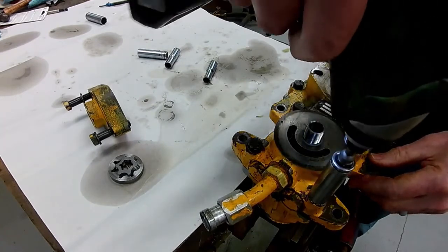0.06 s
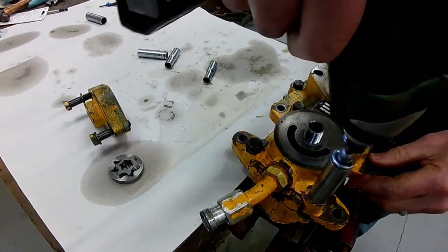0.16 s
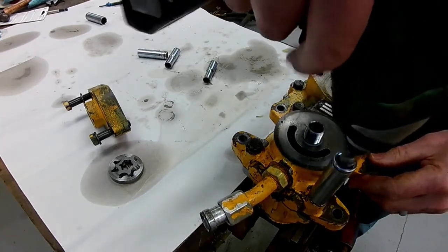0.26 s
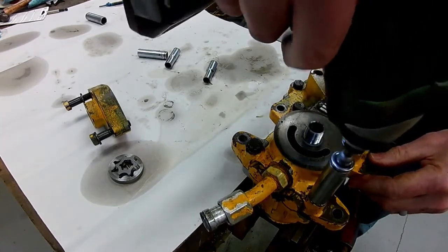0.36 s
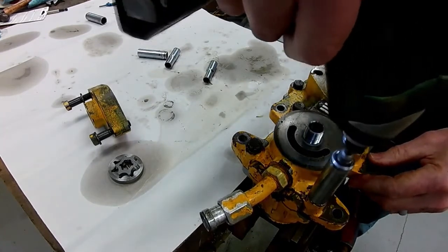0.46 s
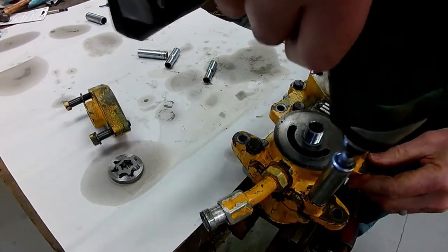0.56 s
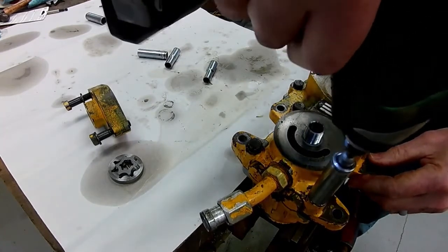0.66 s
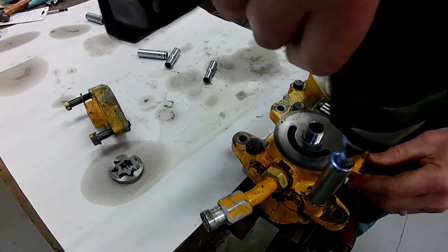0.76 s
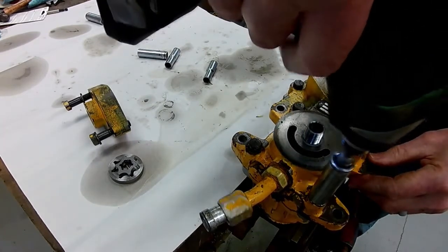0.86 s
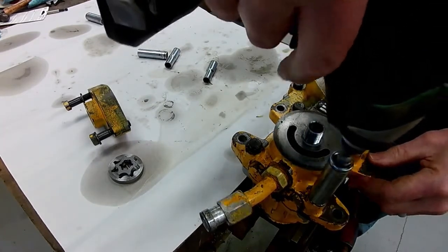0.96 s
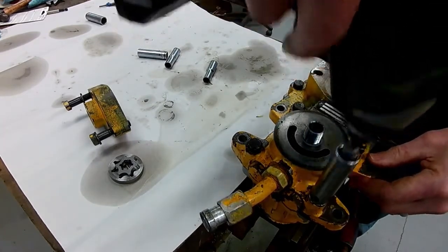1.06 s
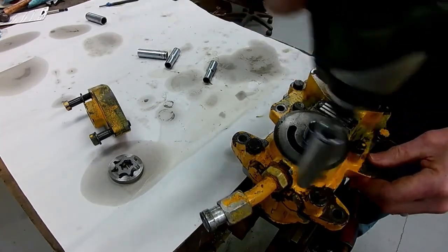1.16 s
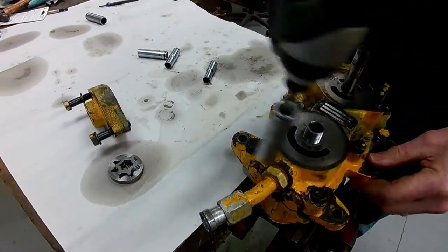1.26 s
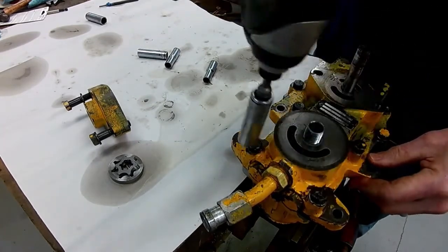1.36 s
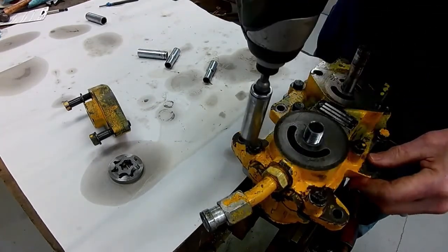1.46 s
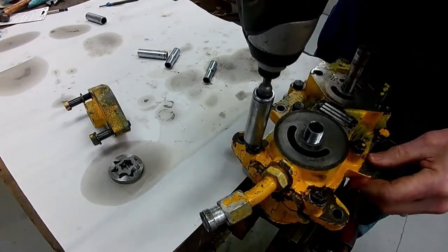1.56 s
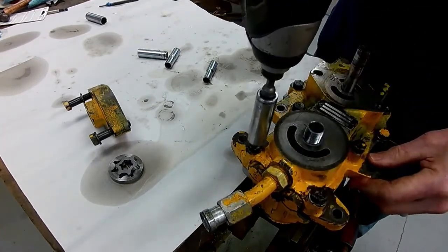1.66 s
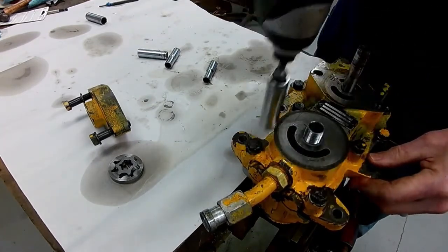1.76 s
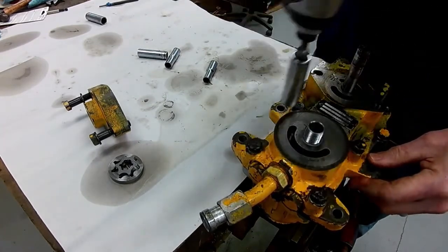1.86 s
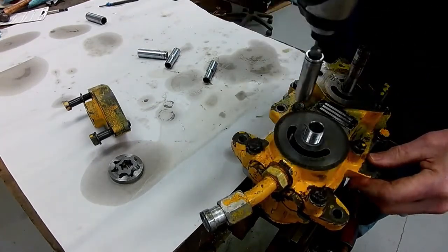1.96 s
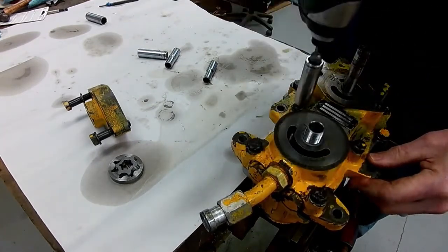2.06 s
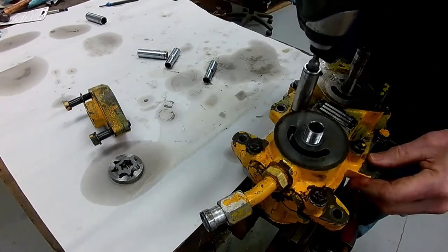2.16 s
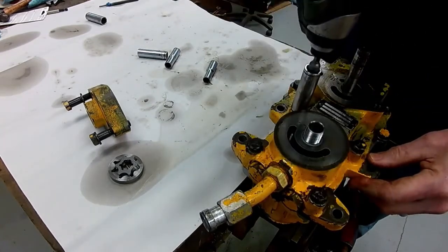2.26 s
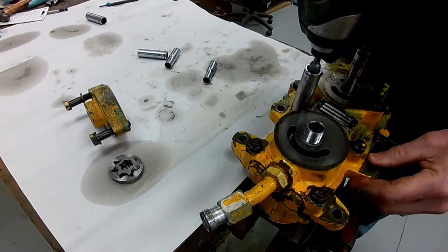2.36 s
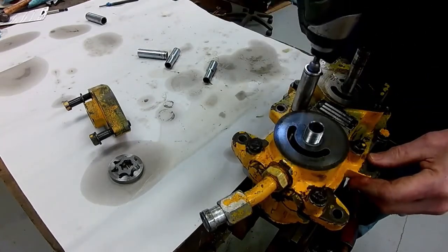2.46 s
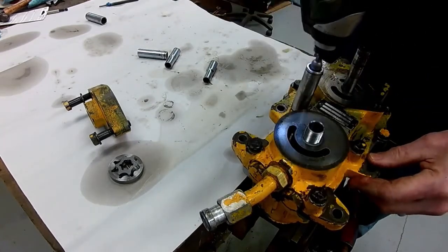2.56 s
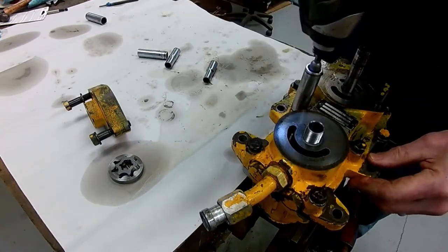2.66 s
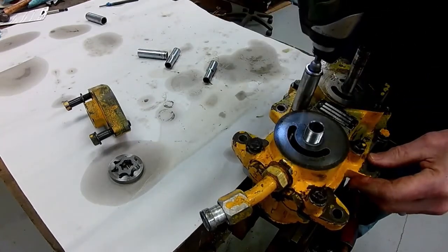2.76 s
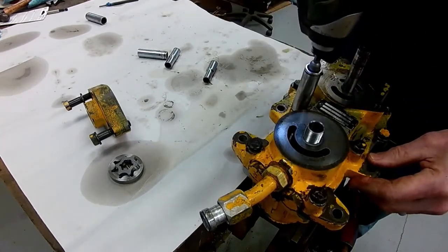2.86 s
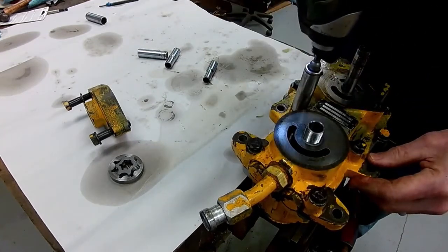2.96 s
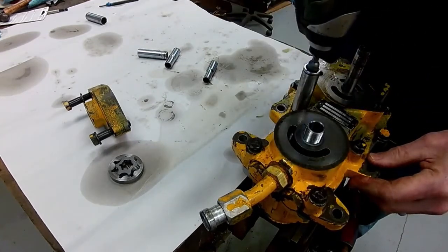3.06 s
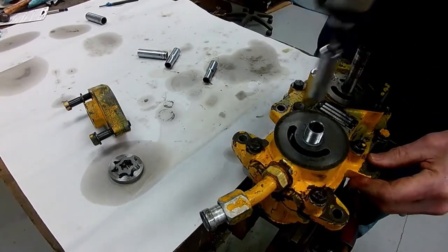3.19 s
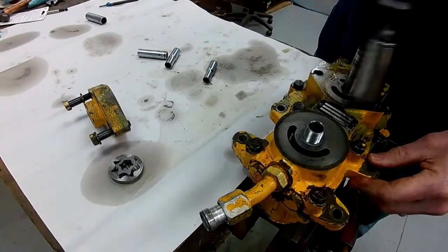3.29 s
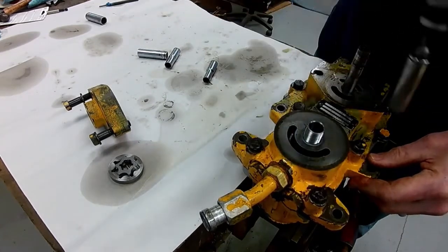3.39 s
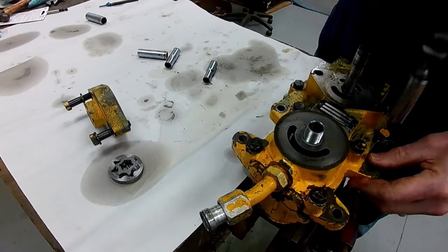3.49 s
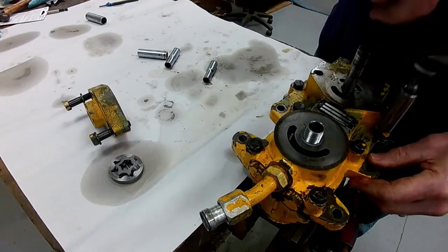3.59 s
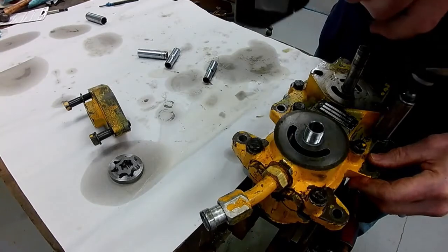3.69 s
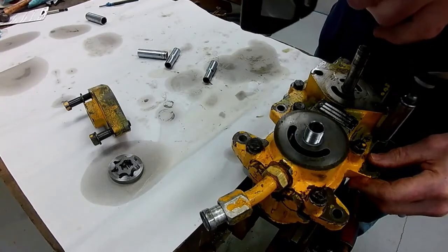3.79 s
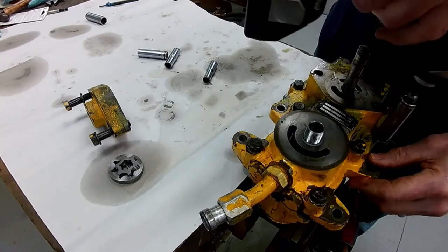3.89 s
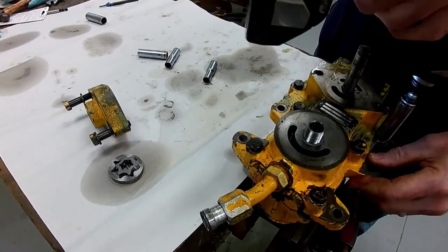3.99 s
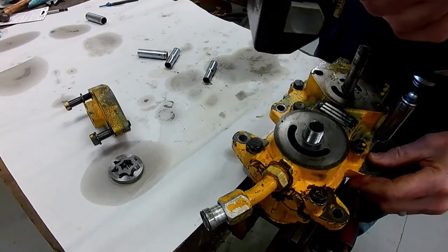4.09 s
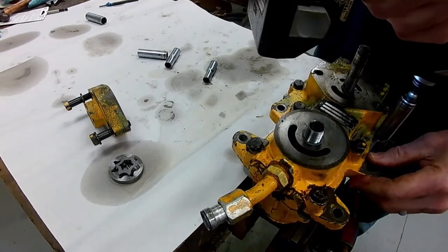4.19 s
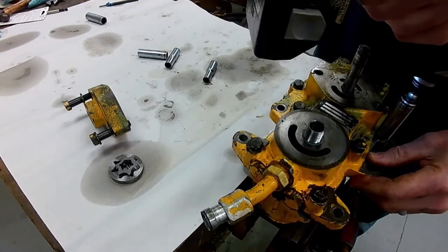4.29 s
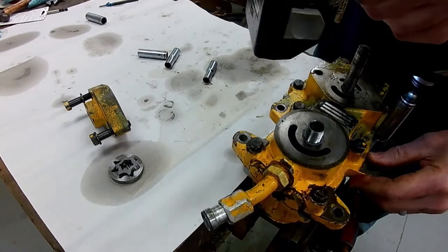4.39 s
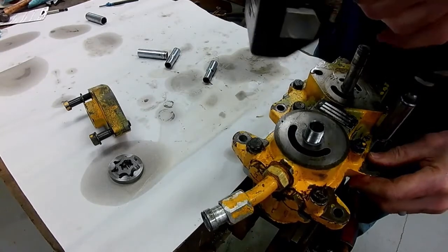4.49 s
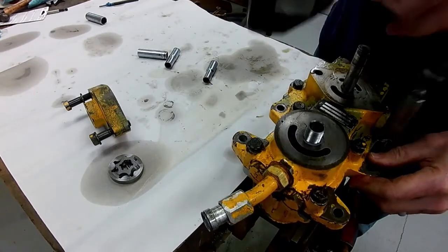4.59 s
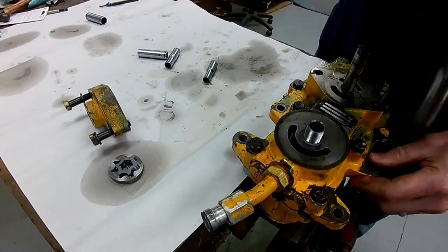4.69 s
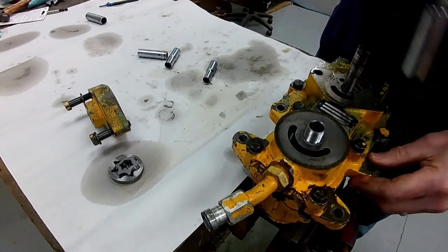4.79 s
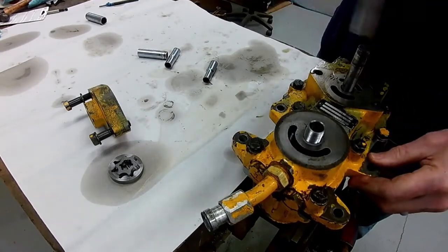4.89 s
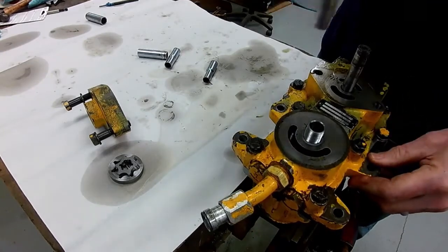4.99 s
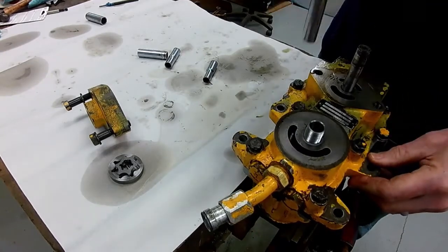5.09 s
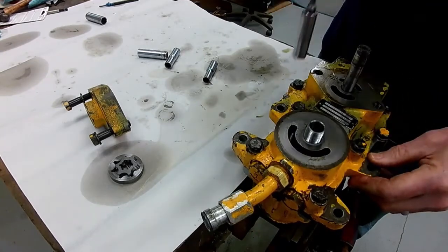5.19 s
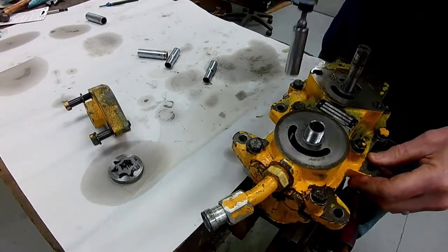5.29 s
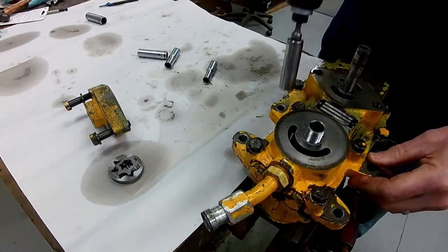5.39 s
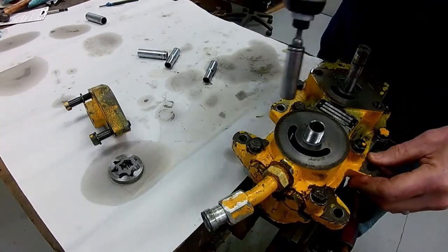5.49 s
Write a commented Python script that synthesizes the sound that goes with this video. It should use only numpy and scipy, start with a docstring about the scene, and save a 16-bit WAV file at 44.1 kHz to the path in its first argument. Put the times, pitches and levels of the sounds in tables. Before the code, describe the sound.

A cordless impact wrench hammers bolts in four loud, rattling metallic bursts, with quiet pauses and small socket clinks, in a reverberant workshop.

```python
"""Impact wrench on a pump housing

A cordless impact wrench tightens three bolts on a cast pump housing, in four short bursts on a workshop bench.
Hammer blows, about 45 a second, are impulses that ring resonant steel, with more chatter on a tight bolt.
Between bolts the socket clinks onto the next head; motor and gears are throbbing shaped noise.
The room rings on through decaying noise tails, and the close microphone overloads by flattening the peaks."""
import sys
import numpy as np
from scipy import signal
from scipy.fft import rfft, irfft
from scipy.io import wavfile
from scipy.ndimage import uniform_filter1d

SR = 44100
rng = np.random.default_rng(int(sys.argv[2]) if len(sys.argv) > 2 else 0)


def to_wav(s):
    """Save 16-bit WAV."""
    ch = np.atleast_2d(s).T  # columns
    pcm = np.round(np.clip(ch, -1, 1) * 32767)  # PCM
    wavfile.write(sys.argv[1], SR, pcm.astype(np.int16))


N = 244314
TIME = np.arange(N) / SR


def gain_of(db):
    """Logarithmic level: decibels to an amplitude ratio."""
    return 10 ** (np.asarray(db) / 20)


def evened(x):
    """Power normalisation: scales to rms 1."""
    return x / np.sqrt(np.mean(x ** 2) + 1e-20)


def read(points, hz):
    """Interpolation on a logarithmic frequency axis."""
    f, value = np.transpose(points)
    return np.interp(np.log(hz + 1), np.log(f + 1), value)


def add(mix, s, sound):
    """Superposition: mixes a sound in at time s."""
    part = mix[max(round(s * SR), 0):][:len(sound)]
    part += sound[:len(part)]


def response(spectrum, modes=(), size=4096):
    """Minimum phase: the causal impulse response of a smooth spectrum with resonances on top."""
    hz = abs(np.fft.fftfreq(size, 1 / SR))
    db = read(spectrum, hz)
    for f, width, peak in modes:
        db = db + peak / (1 + (2 * (hz - f) / width) ** 2)
    # the Hilbert transform of the log magnitude supplies the phase
    log_response = np.conj(signal.hilbert(np.log(gain_of(db))))
    return np.fft.ifft(np.exp(log_response)).real[:size // 2]


def noise(spectrum):
    """Spectral shaping: steady random noise of rms 1 with the given spectrum."""
    shape = gain_of(read(spectrum, np.fft.rfftfreq(N, 1 / SR)))
    return evened(irfft(rfft(rng.standard_normal(N)) * shape, N))


def strike(ring, chatter_s, rattle, settle_s, contacts_per_s, size=1024):
    """Impulse excitation: a hard contact, then tiny rebounds, ring the steel; rms 1 over about a blow period."""
    t = np.arange(size) / SR
    rebounds = rng.standard_normal(size) * (rng.random(size) < contacts_per_s / SR)
    contacts = rattle * rebounds * np.exp(-np.maximum(t - chatter_s, 0) / settle_s)
    contacts[0] = 1
    sound = signal.oaconvolve(contacts, ring)
    return sound * np.sqrt(size / np.sum(sound ** 2))


# Spectrum of the still workshop's air. Each row: frequency in Hz, relative density in dB per Hz.
AIR_SPECTRUM = [(15, -20), (25, 2), (86, -1), (163, -3), (250, -5.5), (301, -5), (344, -6.5), (438, -10.5),
                (543, -2.5), (604, -7.5), (655, -10.5), (856, -10), (1210, -13), (3540, -37.5),
                (15000, -67.5)]
# Faint steady tones. Each row: frequency in Hz, relative level in dB.
HUM_TONES = [(166.9, -62.5), (538.3, -61), (651.4, -77.5), (759.0, -68.5), (904.4, -65)]


def background(air_db=-47.5, hum_db=-1):
    """Stationary noise and pure tones: the low rush of the room with a faint hum."""
    out = gain_of(air_db) * noise(AIR_SPECTRUM)
    for hz, db in HUM_TONES:
        tone = np.sin(2 * np.pi * (hz * TIME + rng.random()))
        out += gain_of(db + hum_db) * np.sqrt(2) * tone
    return out


# Runs of the motor and gears, up before the hammer engages and braked after it.
# Each row: trigger pulled in seconds, trigger released in seconds, level of the noise at full speed in dB.
MOTOR_RUNS = [(-.03, 0.077, -34), (0.051, 0.284, -18.5), (0.375, 0.894, -14), (2.425, 3.017, -18.5),
              (3.971, 4.512, -17.5)]
# Spectrum of the gear noise. Each row: frequency in Hz, relative density in dB per Hz.
GEAR_SPECTRUM = [(60, -14.5), (300, -11.5), (700, -6.5), (1200, 2), (2200, -13), (5000, -17.5),
                 (16000, -32)]


def motor(run_up_s=.03, brake_s=0.0086, shaft_hz=240, mesh=0.19):
    """Amplitude modulation: gear noise grows with the square of motor speed and throbs once a shaft turn."""
    out, gears = np.zeros(N), noise(GEAR_SPECTRUM)
    for on, off, db in MOTOR_RUNS:
        run_up = np.clip((TIME - on) / run_up_s, 0, 1)
        # speed falls half as fast as its square, so brake_s is the decay time of the sound
        speed = run_up * np.exp(-np.maximum(TIME - off, 0) / (2 * brake_s))
        throb = 1 + mesh * np.cos(2 * np.pi * np.cumsum(shaft_hz * speed) / SR)
        out += gain_of(db) * speed ** 2 * throb * gears
    return out


# Single knocks: stray hammer blows in the first burst, a tap as the tool runs down, and light touches of the socket.
# Each row: start in seconds, level in dB, ring in Hz, chatter in seconds.
KNOCK_ROWS = [(0.0151, -17.5, 1570, 0.00055), (0.0605, -23.5, 1200, 0.0024), (0.075, -6, 1460, .004),
              (.117, -8.5, 1307, .0027), (.256, -7, 1240, 0.004), (1.040, -30.5, 1370, .0014),
              (2.089, -49, 1700, 0.0011), (2.098, -44.5, 1050, .002), (2.1305, -43, 1390, .002),
              (2.172, -40.5, 1230, 0.00085), (2.4465, -33, 900, 0.0066), (2.4703, -10, 1170, 0.0006),
              (3.078, -23, 1060, 0.0078), (3.6647, -39.5, 1810, .002), (3.673, -42, 1850, .003),
              (3.778, -42, 1450, 0.00095), (3.799, -39.5, 1300, .003), (3.810, -37.5, 1000, 0.0025),
              (4.0137, -15.5, 1310, .0012)]
# Steel of the single knocks and of the lightly touched socket.
# Each row: frequency in Hz, relative density in dB per Hz.
SOCKET_SPECTRUM = [(30, -26.5), (300, -23.5), (700, -4.5), (1100, -4.5), (1700, -3.5), (2400, -12),
                   (3600, -23), (4900, -19), (6500, -27.5), (16000, -46.5)]


def single_contacts(rows, ring_width_hz=600, ring_db=10):
    """Modal excitation: each single knock or tick stresses one resonance of the steel."""
    out = np.zeros(N)
    for s, db, hz, chatter_s in rows:
        ring = response(SOCKET_SPECTRUM, [(hz, ring_width_hz, ring_db)])
        contact = strike(ring, chatter_s, rattle=.3, settle_s=0.003, contacts_per_s=5500)
        add(out, s, gain_of(db) * contact)
    return out


# How the housing rings under each bolt, before each blow varies it.
# Each row: frequency in Hz, width in Hz, peak in dB over the plain steel spectrum.
FIRST_BOLT_MODES = [(1064, 140, 4), (1456, 230, 3.5), (2320, 280, 4.5), (3350, 100, 3.5), (4496, 59, 3),
                    (7300, 1500, 5.5)]
SECOND_BOLT_MODES = [(1027, 160, 5), (1372, 150, 2), (3200, 91, 1.6), (4320, 100, 5.8), (5100, 190, 5.5)]
THIRD_BOLT_MODES = [(990, 370, 3.75), (1846, 620, 8.2), (2662, 260, 7), (3064, 206, 8), (5470, 480, 6.4)]
# Hammer, anvil and socket struck together. Each row: frequency in Hz, relative density in dB per Hz.
STEEL_SPECTRUM = [(30, -29), (130, -22), (200, -22.5), (300, -13.5), (450, -11), (620, -8), (900, -2),
                  (1250, 0.5), (1700, -4), (2300, -11.5), (3500, -18), (5000, -14), (6500, -16),
                  (8500, -25), (16000, -37.5)]
FREE_RATE, LOADED_RATE = 51, 47.2  # starting blows per s in the quicker first burst and in the later ones
# Bursts of hammering. Each row: first blow in seconds, trigger released in seconds, starting rate in blows per
# second, relative force in dB, bolt tightness (0-1) at the start, the same at the end, easing off at the end in dB,
# first coasting tap in dB, bench boom in dB.
HAMMER_BURSTS = [(0.071, 0.267, FREE_RATE, -2, 0.27, .4, -2.5, -20.5, -1),
                 (0.406, 0.90, LOADED_RATE, 1, 0.29, 0.96, -13, -26, 6.5),
                 (2.478, 3.001, LOADED_RATE, 0, .05, 0.98, -0.5, -16.5, 0),
                 (4.021, 4.489, LOADED_RATE, -1.5, .0, .5, -1, -19, -9.5)]
SLOWING_S = .00007  # each gap between blows is this much longer than the last as the motor labours
LOOSE_DB, TIGHT_DB = -1.5, -1  # relative level of a blow on a loose and on a tight bolt
LOOSE_CHATTER_S, TIGHT_CHATTER_S = 0.00055, 0.0071  # typical chatter of the socket after it
COAST_FADE_DB = 6.5  # each tap of the coasting hammer is this much weaker
BENCH_HZ, BENCH_WIDTH_HZ = 110, 260  # the bench booms under the housing
GRAZE_TIGHT_DB = 6.5  # the grazing grows by this on a fully tight bolt
EASE_S = 0.038  # the blows weaken over this time as the trigger is let go


def struck_steel(modes, boom_db):
    """Modal coupling: the socket seats differently at every blow and favours other, slightly shifted modes."""
    seating = np.clip(1 + .6 * rng.standard_normal(len(modes)), -.3, 2)
    detune = 1 + .03 * rng.standard_normal(len(modes))
    seated = [(hz * shift, width, db * share)
              for (hz, width, db), share, shift in zip(modes, seating, detune)]
    return response(STEEL_SPECTRUM, seated + [(BENCH_HZ, BENCH_WIDTH_HZ, boom_db)])


def hammer(burst, modes, uneven_db=1.37, limp=.35, limp_s=.0014, lug_db=-1.5, graze_db=-17, graze_s=.011, count=3):
    """Repeated impact: two lugs strike in turn, slower and with longer chatter as the bolt tightens, then coast."""
    start, stop, rate, force_db, tight_from, tight_to, ease_db, coast_db, boom_db = burst
    order = np.arange(int((stop - start) * rate) + count + 1)
    times = start + order / rate + SLOWING_S * order ** 2 / 2
    out = np.zeros(N)
    for k, at in enumerate(times[times <= stop]):
        shift_s, strong, long, graze = rng.standard_normal(4) * [.0002, 1, .15, .25]
        ring = struck_steel(modes, boom_db)
        tight = np.clip(np.interp(at, [start, stop], [tight_from, tight_to]), 0, 1)
        chatter = LOOSE_CHATTER_S + tight * (TIGHT_CHATTER_S - LOOSE_CHATTER_S)
        # on a tight bolt one lug lands early and chatters long, the other late and short
        lug = (-1) ** k * tight
        level_db = force_db + LOOSE_DB + tight * (TIGHT_DB - LOOSE_DB)
        level_db += uneven_db * strong + lug_db * lug
        level_db += np.interp(at, [stop - EASE_S, stop], [0, ease_db])
        blow_chatter = chatter * np.exp(limp * lug + long)
        blow = strike(ring, blow_chatter, rattle=.35, settle_s=0.0017, contacts_per_s=6000)
        add(out, at - limp_s * lug + shift_s, gain_of(level_db) * blow)
        # between blows the lug grazes over the top of the anvil
        scrape = strike(ring, chatter, rattle=1.3, settle_s=0.0061, contacts_per_s=3000)
        scrape_db = level_db + graze_db + GRAZE_TIGHT_DB * tight
        add(out, at + graze_s * (1 + graze), gain_of(scrape_db) * scrape)
    coasting_ring = response(STEEL_SPECTRUM, modes)
    for k, at in enumerate(times[times > stop][:count]):
        tap = strike(coasting_ring, LOOSE_CHATTER_S, rattle=2.0, settle_s=0.002, contacts_per_s=3400)
        add(out, at, gain_of(coast_db - COAST_FADE_DB * k) * tap)
    return out


# The socket feels its way onto a bolt head. Each row: start in seconds, end in seconds, relative level in dB.
FUMBLE_ROWS = [(2.104, 2.125, -47.5), (2.175, 2.2, -48), (3.682, 3.775, -47.5)]
TICK_GAP_S, TICK_HZ, TICK_CHATTER_S = 0.043, 1450, .003  # nominal spacing and pitch, and the chatter of a tick


def ticks(uneven_db=2, spread=.18):
    """Random excitation: light touches scattered through each fumble, as rows like those of the knocks."""
    rows = []
    for start, end, db in FUMBLE_ROWS:
        for s in np.arange(start, end, TICK_GAP_S):
            late, strong, high = rng.standard_normal(3)
            at = s + TICK_GAP_S * spread * abs(late)
            hz = TICK_HZ * np.exp(spread * high)
            rows.append((at, db + uneven_db * strong, hz, TICK_CHATTER_S))
    return rows


def sliding(slide_db=-6, fade_s=.012):
    """Friction noise: during each fumble the socket's rim slides over the bolt head."""
    level = np.zeros(N)
    for start, end, db in FUMBLE_ROWS:
        fade = np.interp(TIME, [start, start + fade_s, end, end + 2 * fade_s], [0, 1, 1, 0])
        level += gain_of(db + slide_db) * fade
    return level * noise(SOCKET_SPECTRUM)


# Dull bumps of the housing as the tool settles on it. Each row: start in seconds, level in dB, frequency in Hz.
BUMP_ROWS = [(3.678, -42.5, 175.2), (3.818, -37, 197.2)]


def bumps(t60=0.15):
    """Damped oscillation: the heavy housing rocks briefly on the bench."""
    out, t = np.zeros(N), np.arange(SR // 4) / SR
    for s, db, hz in BUMP_ROWS:
        decay = 10 ** (-3 * t / t60)
        add(out, s, gain_of(db) * decay * np.sin(2 * np.pi * hz * t))
    return out


# Reverberation of the room. Each row: frequency in Hz, time to decay by 60 dB in seconds.
ROOM_DECAY = [(100, 0.22), (250, 0.9), (550, 0.65), (1400, 0.61), (3700, 0.69), (8000, 0.33), (16000, 0.61)]


def tail(build_s=0.0013):
    """Diffuse reverberation: sparse random reflections build up, then die band by band."""
    reflections = rng.standard_normal(SR) * (rng.random(SR) < 4000 / SR)
    hz, t, z = signal.stft(reflections, SR, nperseg=256)
    decay = 10 ** (-3 * t / read(ROOM_DECAY, hz)[:, None])
    z = z * decay * (1 - np.exp(-(t / build_s) ** 2))
    taps = signal.istft(z, SR, nperseg=256)[1]
    return taps / np.linalg.norm(taps)


def workshop(x, near_db=-16, room_db=-15, near_s=0.0058, count=3):
    """Reflection: quick echoes off bench and worker, and a room tail that shifts as the tool moves."""
    t = np.arange(SR // 20) / SR
    echoes = rng.choice([-1., 1.], len(t)) * (rng.random(len(t)) < 1500 / SR)
    near = echoes * (t > .002) * np.exp(-t / near_s)
    out = x + gain_of(near_db) * signal.oaconvolve(x, near / np.linalg.norm(near))[:N]
    # the sound is steadily passed round between several tails
    for k in range(count):
        share = np.sqrt(2 / count) * np.cos(np.pi * (2.5 * TIME + k / count))
        out = out + gain_of(room_db) * signal.oaconvolve(x * share, tail())[:N]
    return out


def scene():
    """Superposition of the four bursts (two on the first bolt), motor and single contacts in the room."""
    bolts = [FIRST_BOLT_MODES, FIRST_BOLT_MODES, SECOND_BOLT_MODES, THIRD_BOLT_MODES]
    blows = sum(hammer(burst, modes) for burst, modes in zip(HAMMER_BURSTS, bolts))
    contacts = single_contacts(KNOCK_ROWS) + single_contacts(ticks()) + sliding()
    sources = motor() + contacts + blows + bumps()
    return (workshop(sources) + background())[None]


def overload(x, ceiling, knee):
    """Saturation: linear for small signals, flattening toward the ceiling."""
    return x / (1 + abs(x / ceiling) ** knee) ** (1 / knee)


# Frequency response of the microphone. Each row: frequency in Hz, gain in dB.
MICROPHONE_RESPONSE = [(20, -7), (100, -1), (4000, -2.5), (5300, -8.5), (6500, -15.5), (7900, -22.5),
                       (9500, -23), (16000, -22.5)]
# Faint treble fizz on loud passages. Each row: frequency in Hz, relative density in dB per Hz.
FIZZ_SPECTRUM = [(30, -42.5), (4000, -20.5), (6500, 2), (9000, 2.5), (16000, -14.5)]


def record(dry, fizz_db=-37, edge_hz=15750):
    """Nonlinear transduction: the microphone flattens blows and dulls treble; fizz follows power; band limit."""
    flattened = overload(dry[0], ceiling=.98, knee=8)
    coloured = signal.oaconvolve(flattened, response(MICROPHONE_RESPONSE))[:N]
    clipped = overload(coloured, ceiling=1.05, knee=10)
    power = abs(uniform_filter1d(clipped ** 2, size=1500))
    fizz = power / np.sqrt(power.max()) * noise(FIZZ_SPECTRUM)
    out = clipped + gain_of(fizz_db) * fizz
    low_pass = signal.firwin(511, edge_hz, window=("kaiser", 9), fs=SR)
    return signal.oaconvolve(out, low_pass, "same")[None]


dry = scene()
out = record(dry)
to_wav(out)
```